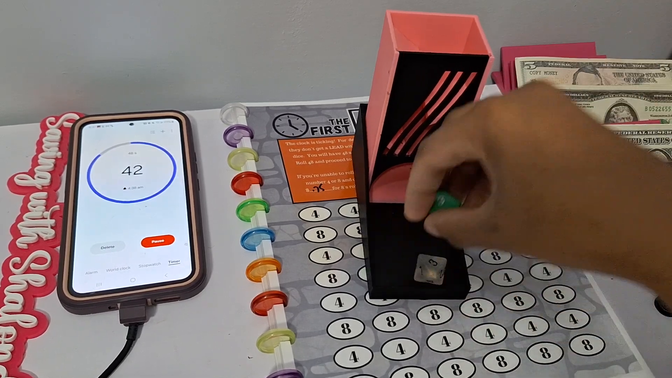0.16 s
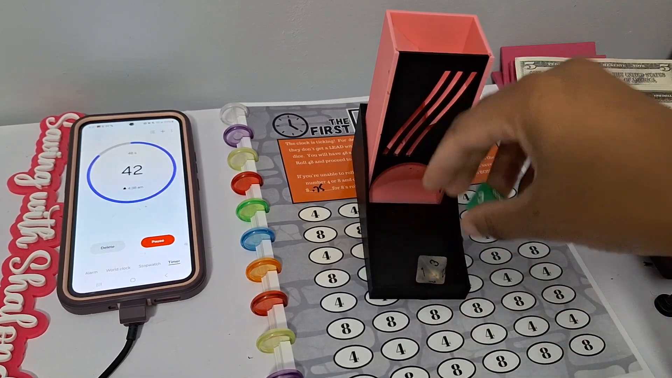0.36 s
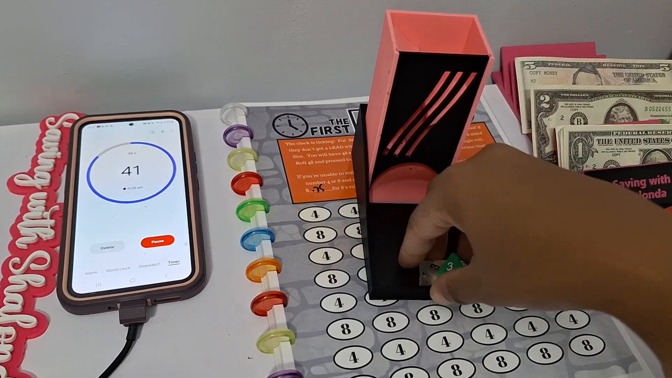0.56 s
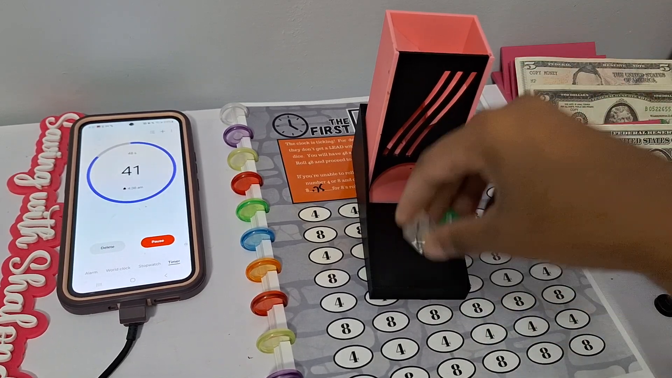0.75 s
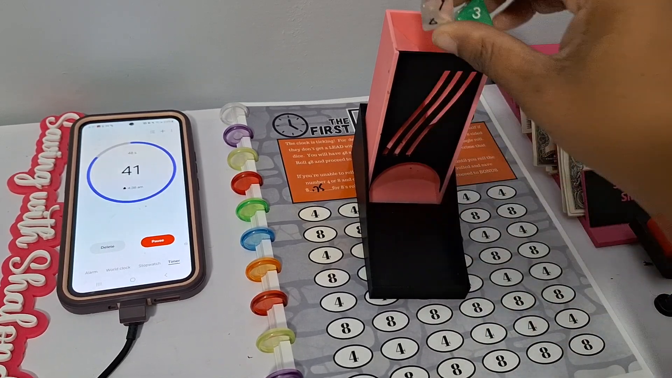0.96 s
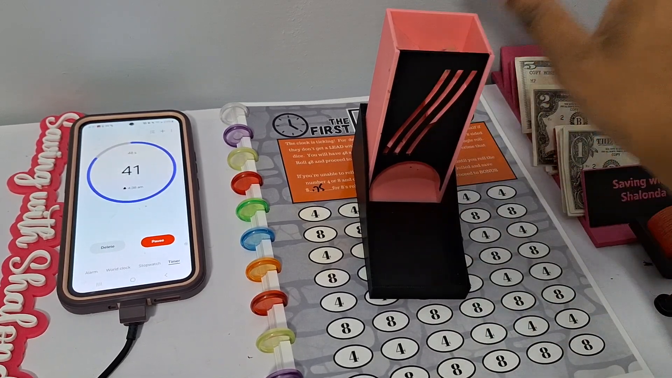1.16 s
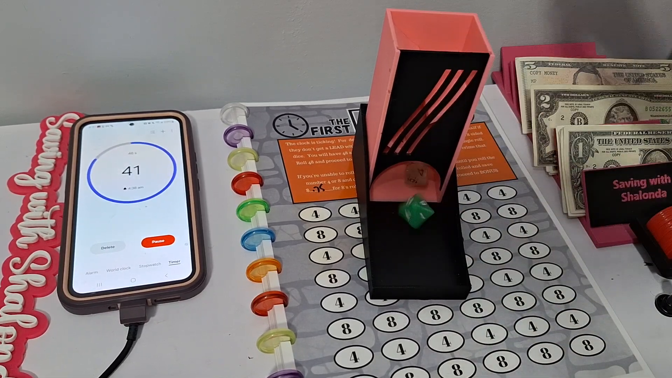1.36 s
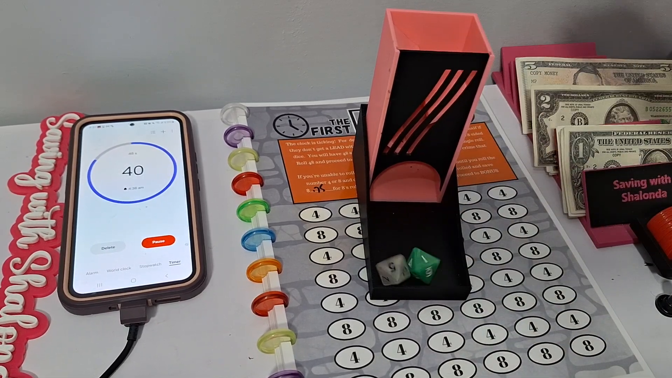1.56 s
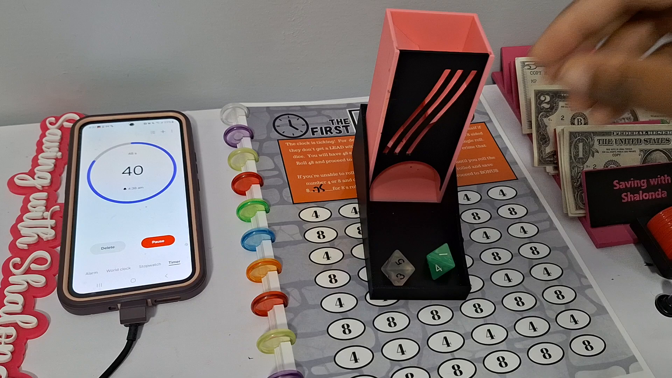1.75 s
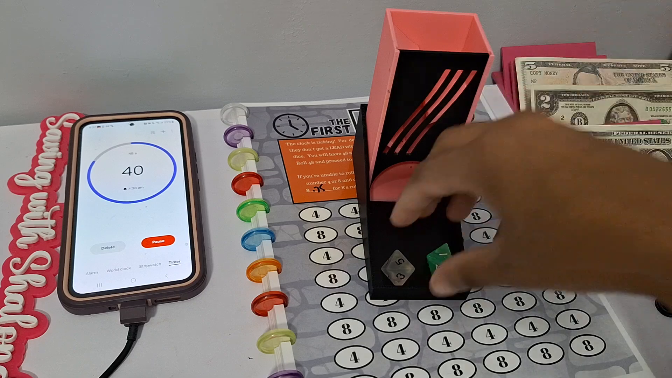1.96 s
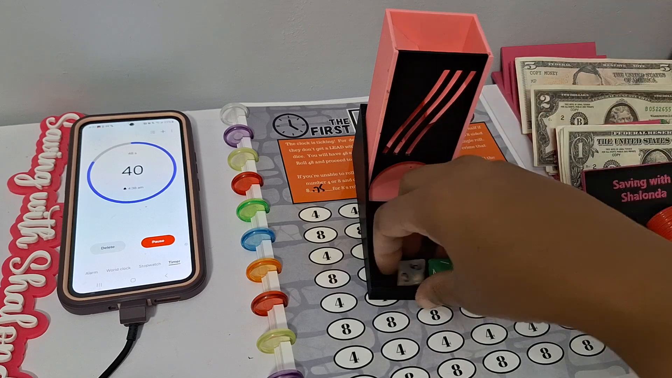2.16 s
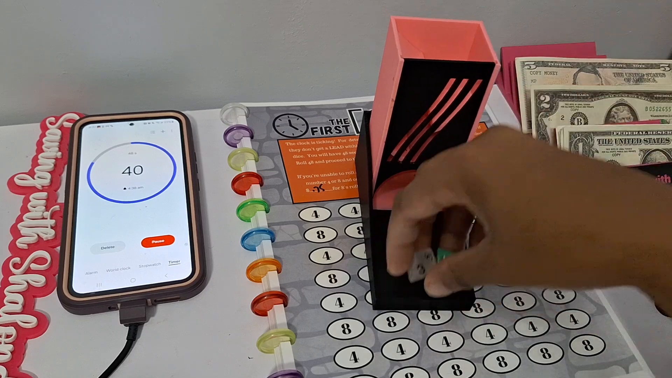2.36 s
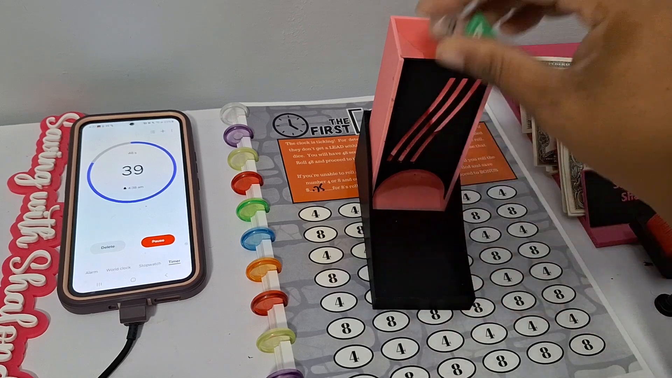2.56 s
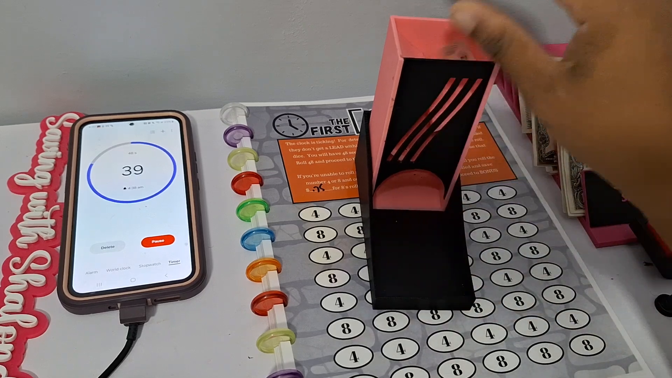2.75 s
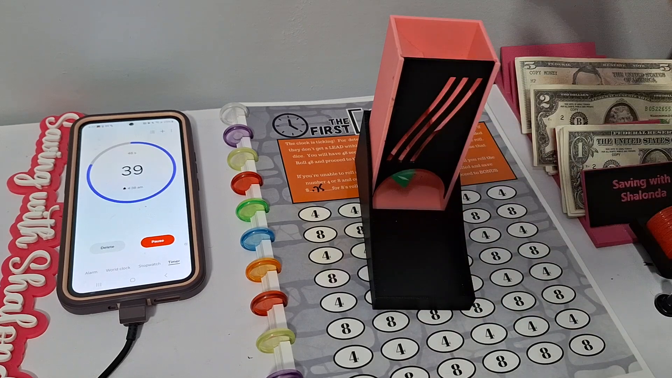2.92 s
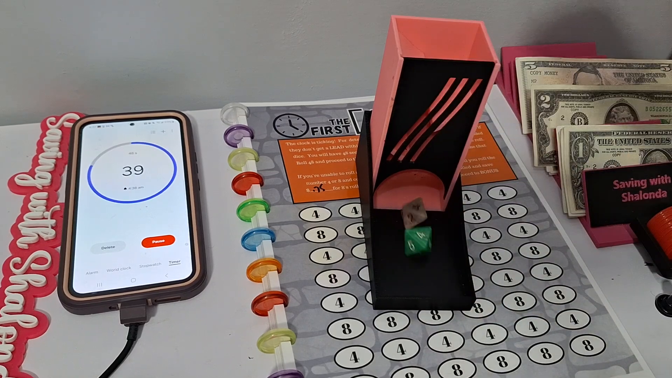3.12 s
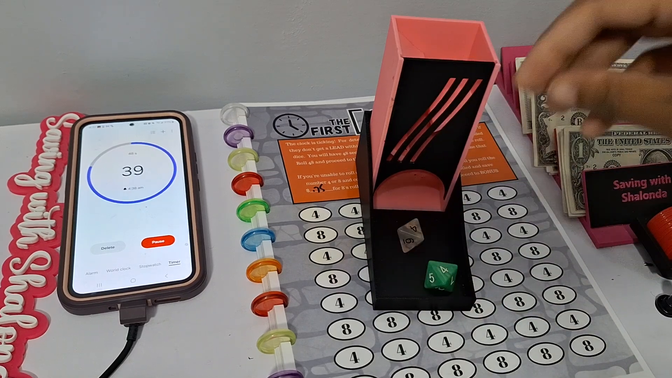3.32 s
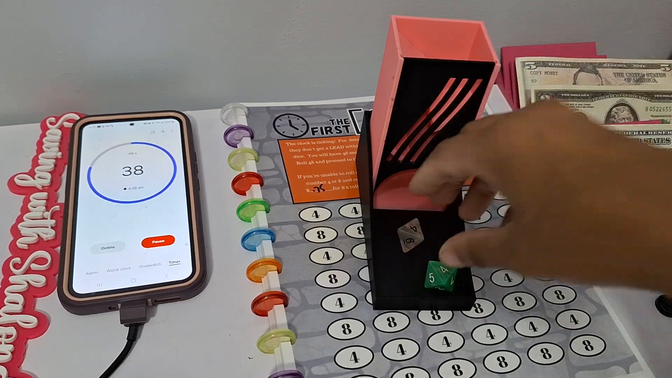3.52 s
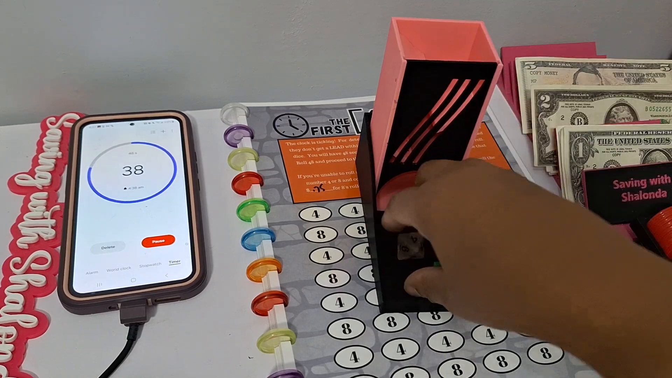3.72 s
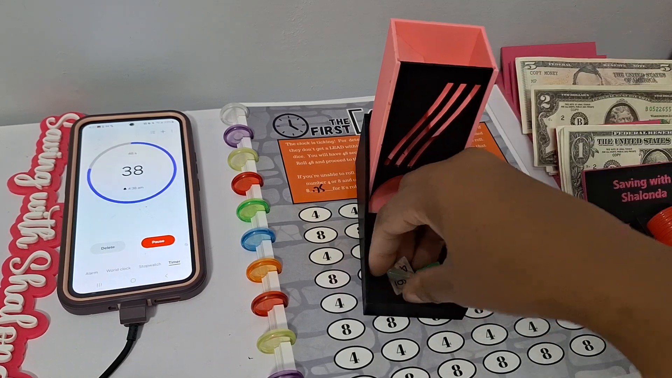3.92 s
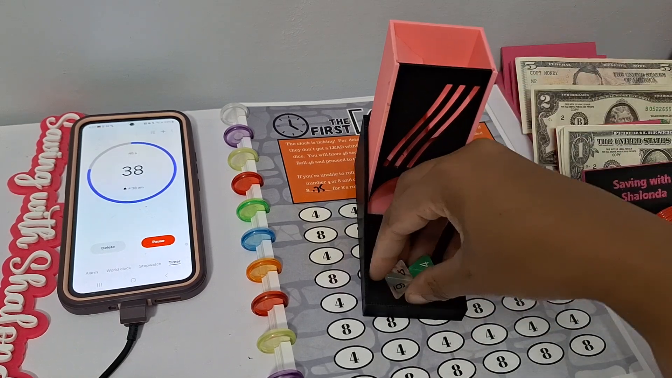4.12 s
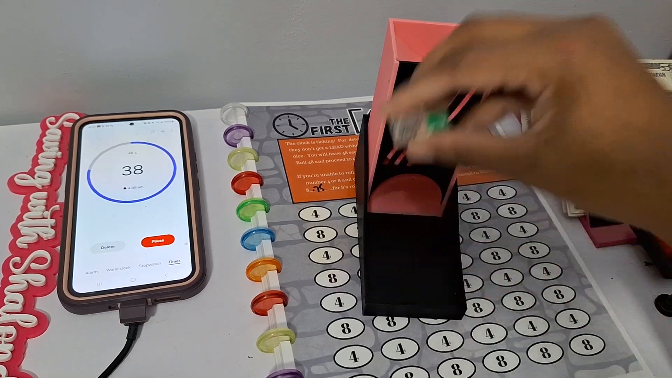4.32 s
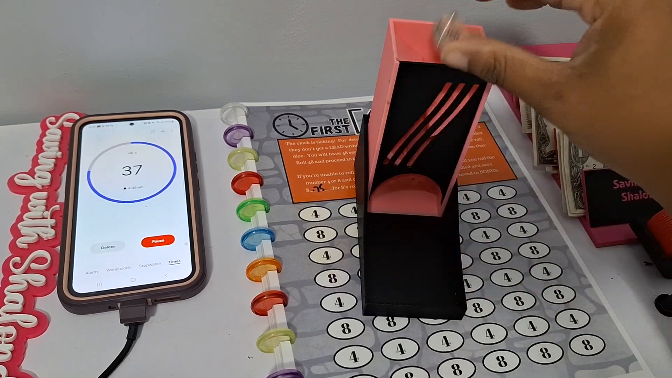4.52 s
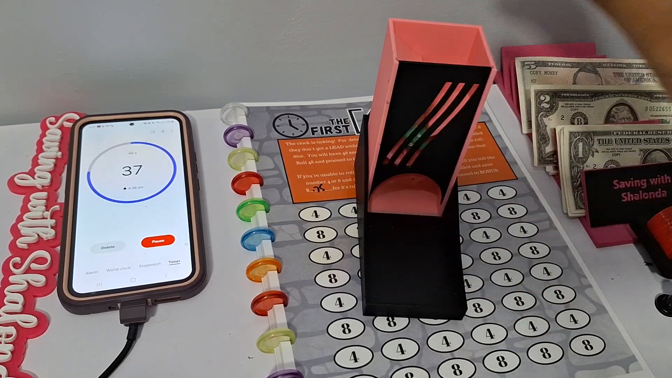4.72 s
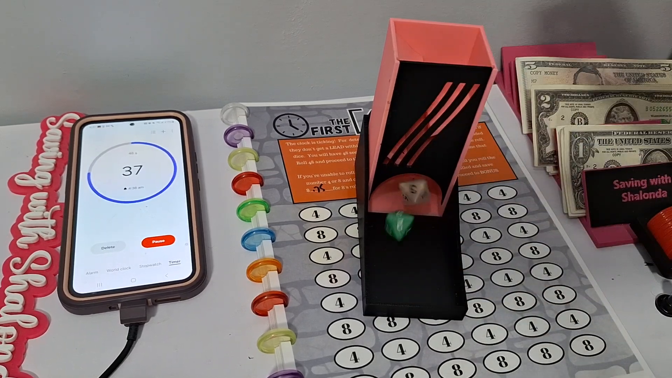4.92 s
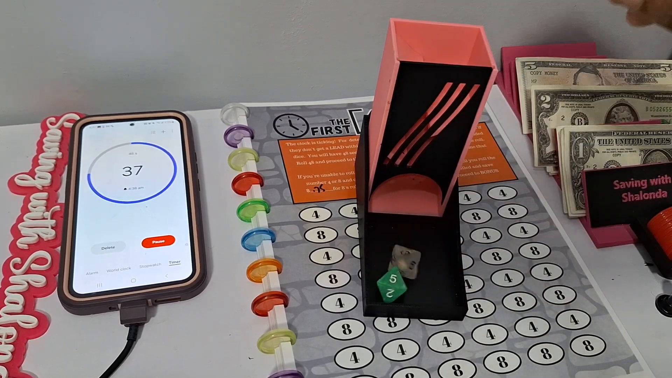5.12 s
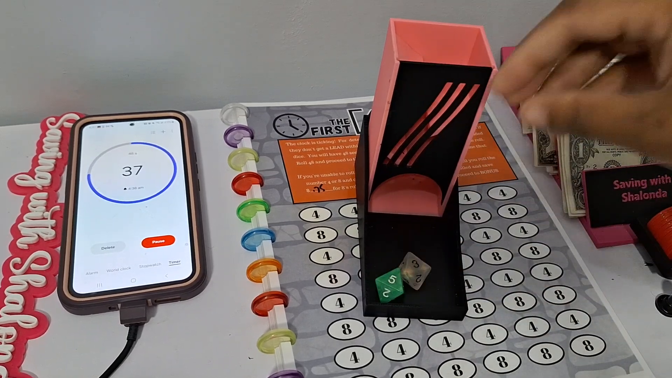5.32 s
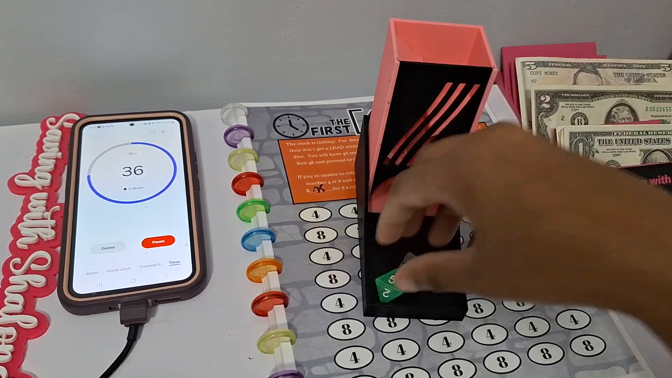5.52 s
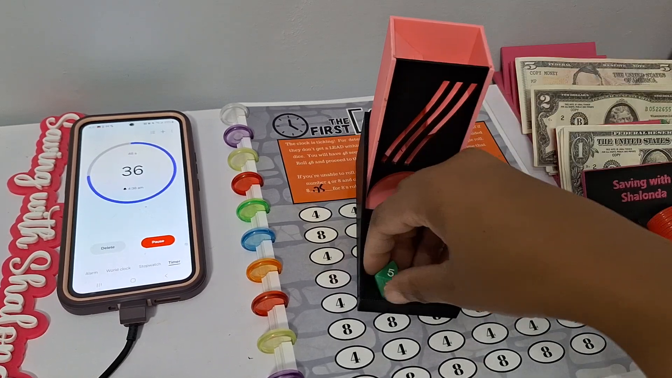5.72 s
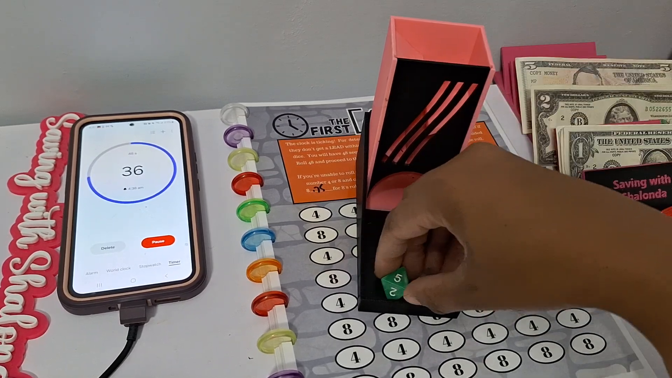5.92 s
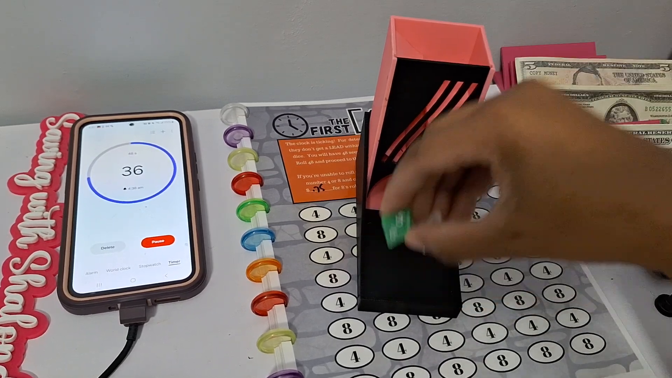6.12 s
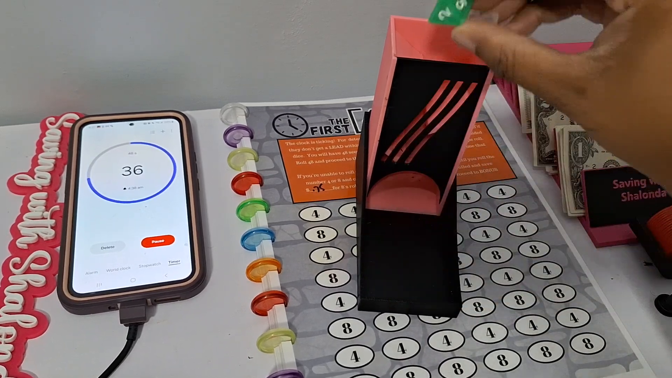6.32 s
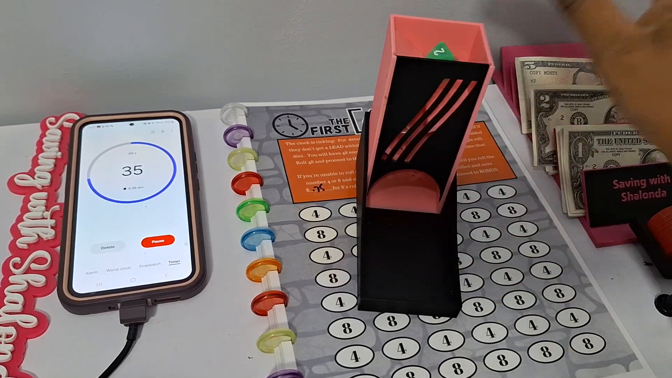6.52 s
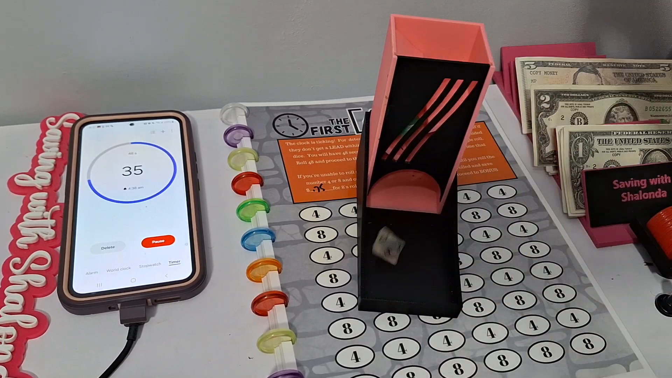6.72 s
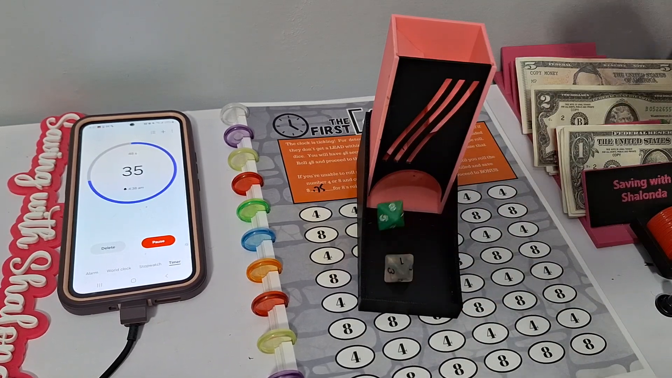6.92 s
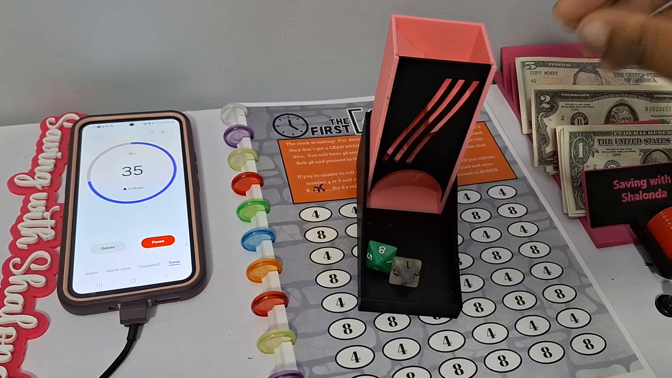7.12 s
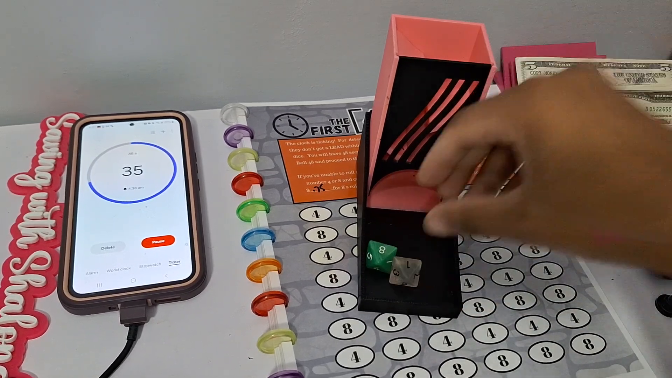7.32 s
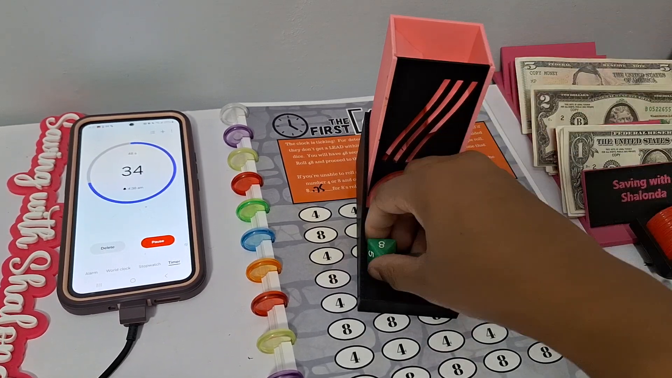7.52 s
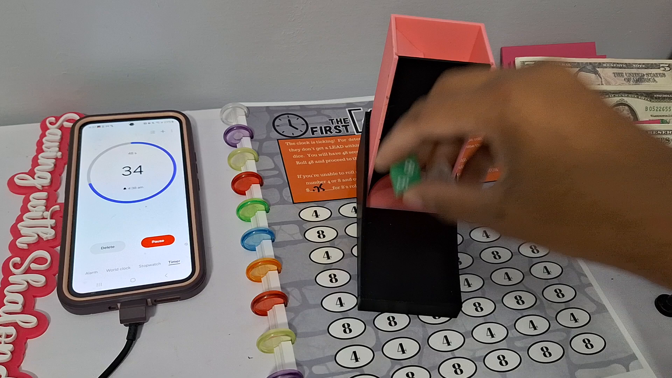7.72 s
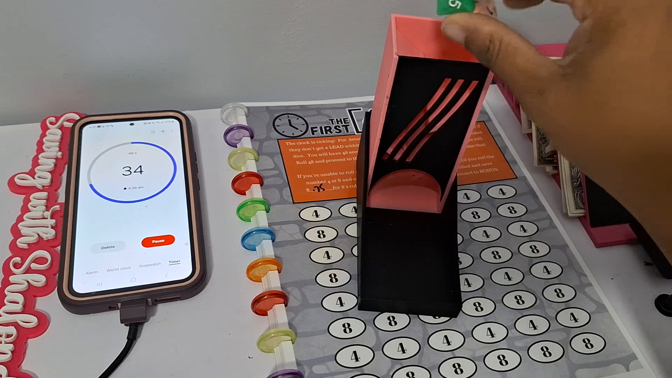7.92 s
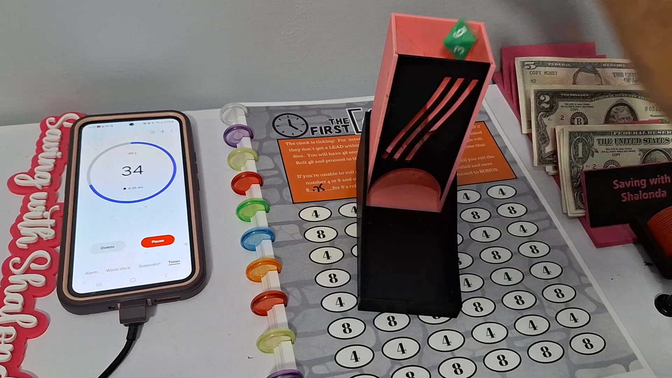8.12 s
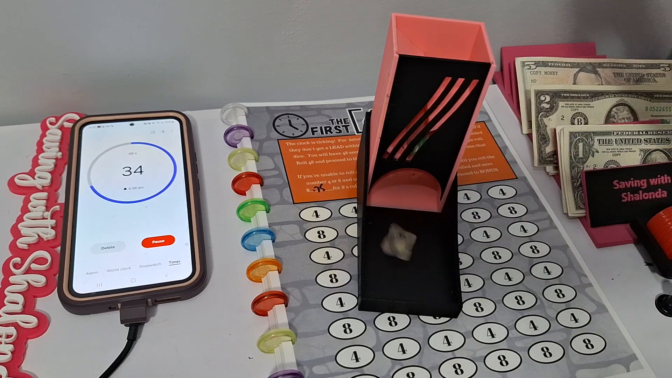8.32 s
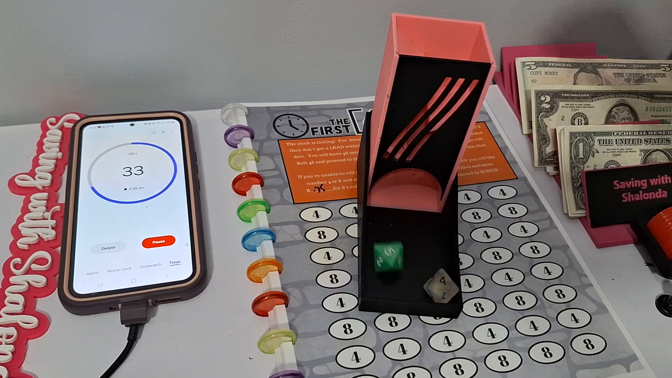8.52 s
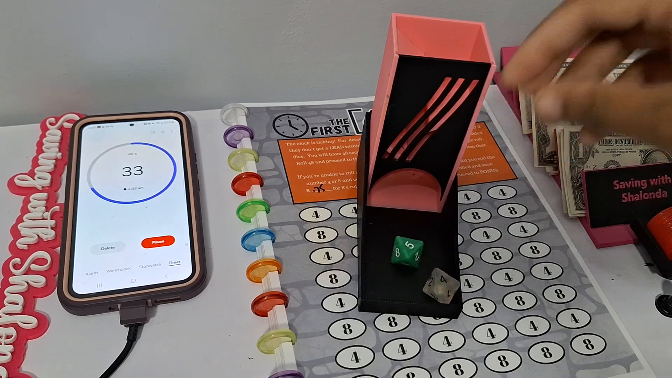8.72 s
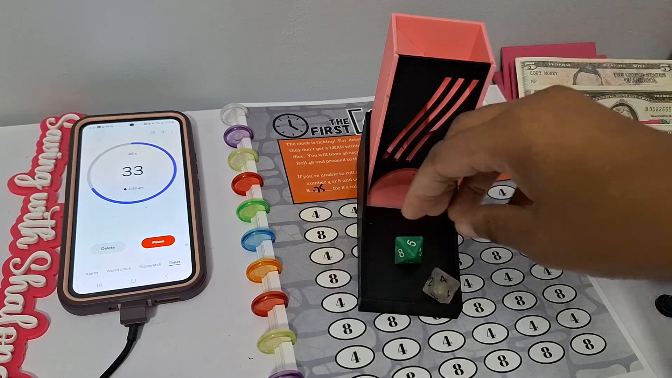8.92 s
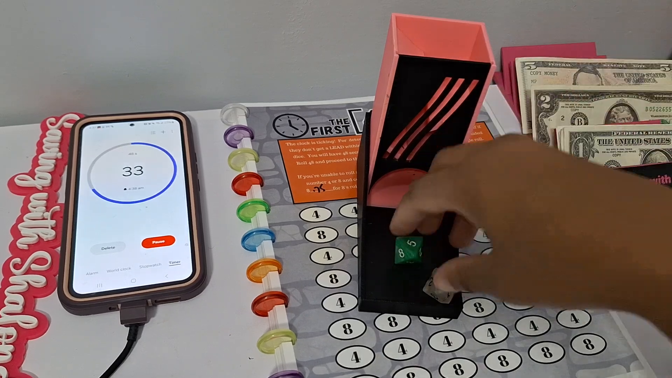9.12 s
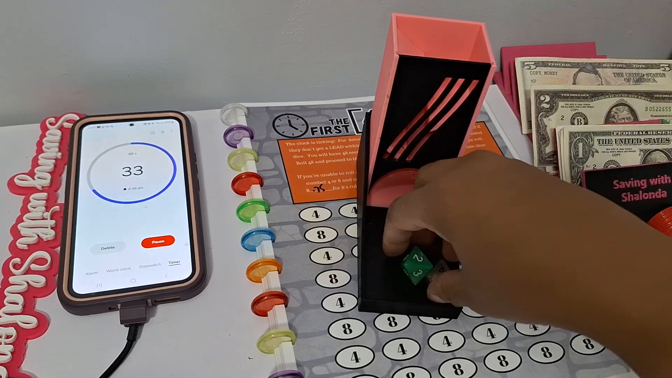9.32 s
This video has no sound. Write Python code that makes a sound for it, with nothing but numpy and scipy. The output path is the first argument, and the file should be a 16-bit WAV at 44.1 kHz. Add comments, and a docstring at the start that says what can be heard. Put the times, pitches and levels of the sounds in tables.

```python
"""Two dice clatter five times down a thin plastic tower, over its baffles, and tumble into the tray below.
Between throws fingers gather them with lighter clicks and scuffs. Hum, rumble and hiss lie beneath.
Timed knocks ring damped modes of tower or tray and spit bright noise; dense tiny clicks make the patter.
The table under the tray thumps softly through its own low modes, and a small room answers the dice."""
import sys
import numpy as np
from scipy import signal
from scipy.fft import rfft, irfft
from scipy.io import wavfile

SR = 44100
rng = np.random.default_rng(int(sys.argv[2]) if len(sys.argv) > 2 else 0)


def materialize(psi):
    """Save the field psi as 16-bit PCM at rate SR to the path in sys.argv[1].

    A 1-D psi becomes a single channel; in a 2-D psi each row is a channel.
    """
    bounded = np.clip(np.atleast_2d(psi).T, -1, 1)
    quanta = np.round(bounded * 32767).astype(np.int16)
    wavfile.write(sys.argv[1], SR, quanta)


N = 417186  # length in samples

# relative spectrum of hard plastic contact: (f/Hz, level/dB)
CRACK_SPECTRUM = [(240, -46), (400, -30), (609, -16), (2290, -7), (2710, -3.5), (3370, -3), (5500, -7),
                  (7700, -11.5), (8600, -19.5), (12900, -22), (15300, -23.5), (16500, -34)]
# the five throws: (dropped/s, out of the tower/s, at rest/s)
THROW_TIMES = [(1.1, 1.44, 1.8), (2.75, 3.05, 3.35), (4.61, 4.93, 5.35), (6.48, 6.85, 7.2),
               (8.07, 8.41, 8.8)]
SPLIT_HZ = 1900  # parts the low modes of the plastic from the high ones


def from_db(db):
    """Decibels to gain."""
    return 10 ** (np.asarray(db) / 20)


def rms_one(x):
    """Scaled to unit power."""
    return x / np.sqrt(np.mean(x ** 2) + 1e-30)


def in_time(rows, silent_db=-140):
    """Curve columns at every sample, silent outside the table."""
    s, *columns = np.transpose(rows)
    t = np.arange(N) / SR
    return [np.interp(t, s, c, left=silent_db, right=silent_db) for c in columns]


def at_hz(points, hz, axis=1):
    """A table column read on a log-frequency scale."""
    points = np.array(points)
    return np.interp(np.log(np.maximum(hz, 1)), np.log(points[:, 0]), points[:, axis])


def coloured(x, spectrum):
    """Causal colouring: the minimum-phase filter of a spectrum, found by folding its cepstrum."""
    bins_hz = np.arange(2049) * SR / 4096
    cepstrum = irfft(np.log(from_db(at_hz(spectrum, bins_hz))))
    cepstrum[1:2048] *= 2
    cepstrum[2049:] = 0
    impulse = rms_one(irfft(np.exp(rfft(cepstrum)))) / 64  # unit energy over 4096 samples
    return signal.oaconvolve(x, impulse[None], axes=1)[:, :N]


def stereo_noise(alike):
    """White noise whose two sides correlate by the amount alike."""
    alike = np.clip(alike, 0, 1)
    mid, side = rng.standard_normal((2, N))
    return np.sqrt((1 + alike) / 2) * mid + np.sqrt((1 - alike) / 2) * side * [[1], [-1]]


def drift(rate):
    """Smooth random wander of unit power: noise through two equal low-pass poles at rate/Hz."""
    r = np.exp(-2 * np.pi * rate / SR)
    wander = signal.lfilter([1], [1, -2 * r, r * r], rng.standard_normal(N + SR))
    return rms_one(wander[SR:])  # the first second only settles the filter


def ring(clicks, hz, t60):
    """A damped resonator: a unit click sets a sine of height 1 ringing."""
    r, w = from_db(-60 / (t60 * SR)), 2 * np.pi * hz / SR
    return signal.lfilter([0, np.sin(w)], [1, -2 * r * np.cos(w), r * r], clicks + 1e-18)


def strike(modes, s, strengths, stutter_s, lag_s):
    """Each knock is a quick stutter of corner and edges, felt differently by each mode.
    Each mode reaches the two channels at its own lag, and each knock leans a little to one side."""
    lean = from_db(rng.normal(-0.39, 1.0, (len(s), 1)))
    lags = rng.normal(0, lag_s, (len(s), len(modes))) / 2
    struck = np.zeros((2, N))
    for k, (hz, _, t60) in enumerate(modes):
        touches = s[:, None] + stutter_s * rng.random((len(s), 3)) * [.3, 1, 1.8]
        sizes = rng.choice([-1, 1], touches.shape) * [.9, .45, .3] * strengths[:, k:k + 1]
        clicks = np.zeros((2, N))
        for side, sign in enumerate((1, -1)):
            at = ((touches + sign * lags[:, k:k + 1]) * SR).astype(int).clip(0, N - 1)
            np.add.at(clicks[side], at, sizes * lean ** sign)
        struck += ring(clicks, hz, t60)
    return struck


def background():
    """A hum of tone and narrow-band noise with wandering level, a low rumble and a faint hiss."""
    # relative rumble spectrum: (f/Hz, level/dB)
    rumble_spectrum = [(75, -8.5), (90, -10), (130, 1.5), (161, -12.5), (200, -12), (317, -13),
                       (420, -36.5), (600, -62)]
    # relative hiss spectrum: (f/Hz, level/dB)
    hiss_spectrum = [(300, -2.5), (500, -1.5), (1000, -3.5), (2000, -8), (3200, -3.5), (3600, 0.5),
                     (4000, -5), (6500, -14), (12000, -14), (16000, -12)]
    hum_hz, width_hz = 59, 10
    hum_gain = from_db(-61 + 1.5 * drift(4))
    edges_hz = [hum_hz - width_hz / 2, hum_hz + width_hz / 2]
    band = signal.butter(2, edges_hz, "band", fs=SR, output="sos")
    tone = np.sin(2 * np.pi * hum_hz * np.arange(N) / SR)
    hum = tone + .55 * rms_one(signal.sosfilt(band, stereo_noise(.8)))
    hum = hum_gain * hum * [[10 ** 0], [10 ** 0]] * from_db([[.8], [-.8]])  # leans to the first side
    rumble = rms_one(coloured(stereo_noise(0.75), [(40, -38)] + rumble_spectrum))
    hiss = rms_one(coloured(stereo_noise(0.22), [(100, -38)] + hiss_spectrum))
    return hum + from_db(-74.5) * rumble + from_db(-85.5) * hiss


def room(x, delay_s, length_s=.5):
    """A diffuse noise tail, partly shared by the channels, dying band by band."""
    # reverberation by band: (f/Hz, t60/s, relative level/dB)
    decay = [(500, 0.11, 2.5), (900, 0.19, 1.5), (1500, 0.25, 1.5), (3520, .32, -3.5), (7200, 0.24, -6),
             (9000, .2, -0.5), (14000, 0.059, 1.5)]
    t = np.arange(int(length_s * SR)) / SR
    tail, edges = 0, 340 * 2 ** np.arange(0, 6.1, .5)  # half-octave bands
    for low, high in zip(edges, edges[1:]):
        hz = np.sqrt(low * high)
        sos = signal.butter(2, [low, min(high, .48 * SR)], "band", fs=SR, output="sos")
        band = signal.sosfilt(sos, rng.standard_normal((2, len(t))))
        level_db = at_hz(decay, hz, axis=2) - 60 * t / at_hz(decay, hz)
        tail = tail + band * from_db(level_db)
    tail = tail + 0.44 * tail[::-1]   # both channels hear much the same room
    tail *= 1 - np.exp(-(t / delay_s) ** 2)   # the first walls are some way off
    return signal.oaconvolve(x, tail / np.sqrt(np.sum(tail ** 2) / 2), axes=1)[:, :N]


def thumps(s, level_db, thump_hz, focus_db, octaves):
    """The table under the tray booms softly, most near one pitch per blow."""
    # modes of the table top: (f/Hz, relative level/dB, t60/s)
    table_modes = [(80, -8.5, 0.14), (129, -1.5, 0.092), (211, -12, 0.27), (238, -4.5, 0.1),
                   (310, -1, 0.075), (377, -1.5, 0.051), (463, -3.5, 0.018)]
    hz, mode_db, t60 = np.transpose(table_modes)
    near = np.exp(-(np.log2(hz / thump_hz[:, None]) / octaves) ** 2)
    strengths = from_db(level_db)[:, None] * from_db(mode_db + focus_db * near)
    booms = strike(table_modes, s, strengths, stutter_s=0.007, lag_s=0.00005)
    soft = signal.butter(2, 500, fs=SR, output="sos")   # a soft push: no sharp edge
    return signal.sosfilt(soft, booms)


def hand_bumps():
    """The hand bumps tray and table, each bump favouring its own low pitch."""
    # bumps: (t/s, relative level/dB, favoured f/Hz)
    bumps = [(0.053, -57, 133), (.645, -56, 80), (2.128, -50.5, 81), (2.326, -56.5, 130),
             (3.801, -62.5, 205), (3.915, -63.5, 130), (4.363, -54, 130), (5.702, -56, 130),
             (7.55, -58.5, 130), (7.589, -59, 130.5), (9.21, -62, 204), (9.278, -48.5, 290),
             (9.32, -49, 220)]
    return thumps(*np.transpose(bumps), focus_db=19, octaves=0.22)


def knock_thumps(knocks, falling, landed):
    """The table thumps under every knock, less than in proportion; pitch follows where the die is."""
    level_db = -43 + 0.42 * knocks[:, 1] + 2.5 * rng.standard_normal(len(knocks))
    tower_hz, tray_hz, hand_hz = 124, 210, 105.3
    thump_hz = np.select([falling, landed], [tower_hz, tray_hz], hand_hz)
    return thumps(knocks[:, 0], level_db, thump_hz, focus_db=7.5, octaves=0.41)


def scuffs():
    """Level curves of fingers and dice scuffing the tray: a swell, then a quarter-second fade at one rate."""
    # scuffs: (start/s, loudest t/s, loudest level/dB, swell/dB; a negative swell starts louder)
    scuff_table = [(0, 0.156, -45.5, 16), (0.587, 0.589, -36, 6), (0.963, 1.068, -78, 4),
                   (2.084, 2.206, -40.5, 24), (2.302, 2.334, -75, 7), (3.709, 3.765, -60, 17),
                   (3.794, 3.898, -53.5, 18), (3.99, 4.005, -80, 5), (4.313, 4.321, -61.5, 1),
                   (4.356, 4.369, -64, 3), (5.659, 5.696, -48, 9), (5.845, 5.852, -56, 5),
                   (5.935, 5.937, -57, 2), (6.41, 6.414, -80.5, 0), (7.528, 7.573, -57.5, 14),
                   (8.07, 8.072, -45, -2), (9.215, 9.289, -42.5, 23), (9.297, 9.335, -50, -3),
                   (9.433, 9.446, -61, 8)]
    fade_s, fade_db_per_s = .25, 205
    return [[(start, db - swell_db), (loudest, db), (loudest + fade_s, db - fade_db_per_s * fade_s)]
            for start, loudest, db, swell_db in scuff_table]


def tumbles():
    """Level curves of faces and edges pattering: every throw passes through the same four levels."""
    # level/dB just after the drop, on leaving the tower, once rolling in the tray, at the last
    tumble_db = [-30, -36, -43, -47.5]
    late_s, rolling_after_s, still_before_s = 0.051, 0.053, 0.089
    curves = []
    for dropped, out, at_rest in THROW_TIMES:
        times = [dropped + late_s, out, out + rolling_after_s, at_rest - still_before_s]
        curves.append(list(zip(times, tumble_db)))
    return curves


def patter(curves, modes, per_s):
    """Dense tiny clicks at random moments set the plastic buzzing, with a little bright contact noise."""
    level = sum(from_db(in_time(rows)[0]) for rows in curves)
    sizes = from_db(4.5 * np.minimum(rng.exponential(1, N), 4))
    grains = (rng.random(N) < per_s / SR) * sizes * stereo_noise(.5)
    rings = sum(from_db(level_db) * ring(grains, hz, t60 / 2) for hz, level_db, t60 in modes)
    return level * (rms_one(rings) + from_db(-12.5) * rms_one(coloured(grains, CRACK_SPECTRUM)))


def cracks(knocks, t60):
    """A hard contact spits a few milliseconds of bright noise."""
    s, peak_db, crack_db = knocks.T[[0, 1, 5]]
    clicks = np.zeros((2, N))
    clicks[:, (s * SR).astype(int)] = from_db(peak_db + crack_db + 6) * from_db([[-1.0], [1.0]])
    envelope = signal.lfilter([1], [1, -from_db(-60 / (t60 * SR))], clicks + 1e-18)
    envelope = signal.lfilter([.05], [1, -.95], envelope)   # the contact takes half a millisecond to build
    return coloured(envelope * stereo_noise(0.21), CRACK_SPECTRUM)


def twinned(modes, high_s, low_s):
    """Plastic damps high modes fast; facing walls add a quicker twin 5% higher.
    high_s and low_s cap the ring above and below the split."""
    damped = []
    for hz, level_db, t60 in modes:
        cap_s = low_s if hz < SPLIT_HZ else high_s
        damped.append((hz, level_db, min(t60, cap_s, .055 * (3000 / hz) ** 2.3)))
    return damped + [(1.05 * hz, level_db - 2, t60 / 2) for hz, level_db, t60 in damped]


def shell(modes, knocks, focus_db, gain_db):
    """The spot that is hit favours one high and one low pitch; each knock shares out the two mode groups."""
    s, peak_db, high_hz, low_hz, low_db = knocks.T[:5]
    hz, level_db, _ = np.transpose(modes)
    is_low = hz < SPLIT_HZ
    pitch_hz = np.where(is_low, low_hz[:, None], high_hz[:, None])
    near = np.exp(-(np.log2(hz / pitch_hz) / .09) ** 2)
    near[:, is_low] *= .6   # low modes spread over the whole body
    share = from_db(level_db + focus_db * near + 5 * rng.standard_normal(near.shape))
    low = from_db(np.minimum(low_db, 0))[:, None]
    high = np.sqrt(np.maximum(1 - low ** 2, .05))
    for group, gain in ((is_low, low), (~is_low, high)):
        share[:, group] *= gain / np.linalg.norm(share[:, group], axis=1, keepdims=True)
    strengths = from_db(peak_db + gain_db)[:, None] * share
    return strike(modes, s, strengths, stutter_s=.0035, lag_s=.00004)


def scene():
    """Falling dice ring the tower, landed dice the tray; fingers in the tray damp it."""
    # knocks of a die: (t/s, relative level/dB, high ring f/Hz, low ring f/Hz,
    # low ring share/dB (0 at most is used), relative crack level/dB)
    knock_table = [(0.053, -33.5, 2470, 1170, 0, -8), (0.067, -32.5, 2380, 1270, -8, -13),
                   (0.092, -21, 2410, 1250, -3.5, -14), (0.131, -15, 2360, 1350, -15, -13),
                   (0.144, -20, 2400, 1270, -16, -8), (0.171, -22.5, 2390, 1380, -7, -16),
                   (0.183, -28, 2370, 1160, -13, -6), (0.592, -31, 2500, 1280, 2, -0.5),
                   (0.605, -17.5, 2390, 1150, -2, -19), (0.646, -32, 2850, 1150, 5, -10.5),
                   (0.664, -35, 2520, 1150, -2, -8), (0.979, -55.5, 4950, 780, -10, -3.5),
                   (1.049, -49.5, 5920, 620, -27, -6), (1.118, -4, 4760, 1480, -13.5, -10.5),
                   (1.14, -2, 4190, 1000, -15.5, -8), (1.153, -5, 3547, 1020, -15, -8.5),
                   (1.166, -9, 3080, 1000, -18, -8.5), (1.19, -9.5, 2730, 1030, -9.5, -2.5),
                   (1.206, -4.5, 2700, 1100, -16, -9.5), (1.211, -5, 2573, 1810, -11, -13),
                   (1.241, -6, 5160, 1810, -8, -13), (1.251, -9, 5046, 1450, -6, -14),
                   (1.261, -9.5, 3620, 1590, -1.5, -9.5), (1.275, -14.5, 4650, 1590, -1, -15.5),
                   (1.293, -5.5, 3130, 1020, -11.5, -4), (1.307, -5, 2796, 1810, -12, -7.5),
                   (1.324, -5, 2632, 1720, -5.5, -14.5), (1.369, -6, 2217, 1720, -2.5, -8),
                   (1.375, -4.5, 2160, 1030, -10.5, -8), (1.408, -10, 3120, 1820, -18, -5.5),
                   (1.447, -8, 2416, 1460, -22, -14), (1.48, -13.5, 2430, 1490, -22, -16),
                   (1.499, -10, 2400, 1430, -11, -10.5), (1.51, -11.5, 2390, 1660, -9.5, -11),
                   (1.542, -20.5, 2430, 1340, -1, -7.5), (1.552, -20, 4160, 1400, -12, -8),
                   (1.569, -15, 4260, 1040, -15, -6), (1.591, -15, 2410, 1140, -3.5, -10.5),
                   (1.652, -24, 1990, 1140, -2, -8), (1.663, -21, 2400, 1460, -12, -11),
                   (1.688, -28, 4270, 1220, -3, -6), (2.085, -44, 2810, 1160, 1, -18),
                   (2.12, -41, 1980, 1210, -1, -17), (2.132, -30.5, 3960, 1690, -2, -16),
                   (2.16, -30.5, 1910, 1230, 0.5, -7.5), (2.187, -27.5, 1910, 1160, 0, -18),
                   (2.195, -34, 2410, 1130, 3, -10), (2.205, -30.5, 2350, 1290, 0, -4),
                   (2.222, -23, 2394, 1310, -10, -12.5), (2.233, -24, 1923, 1160, -4.5, -7.5),
                   (2.326, -34.5, 2010, 1160, 0, -16), (2.767, -7.5, 4142, 1480, -16, -7),
                   (2.779, -1, 4220, 1490, -9, -7.5), (2.799, -8, 3647, 1560, -14, -6.5),
                   (2.819, -1.5, 2656, 1560, -19.5, -10.5), (2.861, -6, 2670, 1810, 1, -8),
                   (2.896, -4, 3106, 1120, -10, -5), (2.904, -6, 3600, 1810, -8.5, -7),
                   (2.936, -12, 3120, 1700, -23.5, -1), (2.958, -6.5, 2270, 1000, -10.5, -11.5),
                   (2.994, -5.5, 3030, 1710, -13, -10), (3.021, -7.5, 3070, 1710, -20.5, -3.5),
                   (3.065, -14.5, 2700, 1720, -11, -9.5), (3.093, -9.5, 2610, 1260, -8.5, -13.5),
                   (3.13, -26, 2700, 1460, -8, -12), (3.143, -14, 3560, 1140, -10, -12),
                   (3.163, -20, 2690, 1550, -10, -6), (3.172, -19, 3580, 1510, 0, -5.5),
                   (3.182, -17.5, 2440, 1520, -25, -12), (3.192, -26, 2700, 1450, 2, -20),
                   (3.221, -18.5, 3500, 1140, -8, -9.5), (3.263, -24, 2450, 1140, -4, -11),
                   (3.822, -34, 2900, 1250, -1.5, -20), (3.852, -33, 2910, 1160, -14, -9.5),
                   (3.89, -26, 2800, 1140, -15, -19), (3.897, -43, 2430, 1040, -7, -12),
                   (4.002, -44, 2420, 1150, -7, -20), (4.016, -42.5, 2434, 1160, -17.5, -13),
                   (4.318, -52, 2170, 1150, -6, -9), (4.365, -41, 2900, 1460, -3.5, -11.5),
                   (4.626, -9.5, 4513, 1200, -23, -4.5), (4.634, -2.5, 3670, 1680, -15.5, -11),
                   (4.679, -12, 3760, 1670, -14, -12), (4.702, -3, 3636, 1820, -6, -11),
                   (4.706, -9, 2757, 1810, -9, -6.5), (4.731, -6, 4740, 1710, -7.5, -12),
                   (4.736, -7, 2970, 990, -7.5, -8), (4.771, -3.5, 4310, 1020, -9, -11.5),
                   (4.785, -16.5, 4225, 1030, -13.5, -7.5), (4.798, -6, 2870, 980, -7, -7.5),
                   (4.826, -5, 2680, 1810, -7, -8), (4.856, -6, 4270, 1810, -7, -9),
                   (4.884, -10, 2700, 1890, -14.5, -6.5), (4.901, -13.5, 2625, 1010, -5, -7),
                   (4.914, -10, 2110, 1130, -2, -7), (4.949, -5.5, 5190, 1700, -27.5, -9.5),
                   (4.969, -10, 2620, 1140, -8, -7.5), (4.986, -15.5, 2546, 1520, -9.5, -13),
                   (4.994, -17, 3555, 1440, -5.5, -4.5), (5.044, -19.5, 2400, 1450, -14.5, -6.5),
                   (5.067, -18, 2397, 1670, -11.5, -9), (5.082, -19, 4880, 1650, -9, -10.5),
                   (5.091, -10.5, 2400, 1200, -3.5, -7), (5.099, -12.5, 2120, 1440, -7, -12),
                   (5.126, -29, 2420, 1410, -7, -10), (5.14, -19, 2410, 1140, -15.5, -7.5),
                   (5.156, -11, 2420, 1550, -12.5, -10.5), (5.188, -19.5, 3500, 1210, -7.5, -9.5),
                   (5.2, -15, 2440, 1630, -26, -17), (5.21, -28.5, 2420, 1160, -16, -8.5),
                   (5.227, -18, 2470, 1180, -21, -6.5), (5.252, -22.5, 2330, 1530, -27, -8.5),
                   (5.265, -30, 2370, 1160, -12, -12), (5.664, -33.5, 2820, 620, -6.5, -17),
                   (5.677, -30, 2810, 1280, -14.5, -22), (5.681, -28.5, 2780, 1170, -6, -18),
                   (5.69, -27.5, 2360, 1340, -6.5, -25), (5.702, -29, 2810, 1030, -17, -16),
                   (5.718, -34, 2390, 1290, -4, -24), (5.743, -36.5, 5670, 1150, -9, -8),
                   (5.752, -29, 2510, 1180, -4.5, -17), (5.847, -32.5, 2550, 1160, -4, -10),
                   (5.896, -37.5, 2520, 1160, -3.5, -19), (5.932, -22, 2540, 1170, -15.5, -15.5),
                   (6.415, -56, 5230, 660, -22, -6.5), (6.499, -7.5, 3760, 1870, -21.5, -12),
                   (6.506, -4, 3840, 1890, -21, -7.5), (6.513, -8, 4230, 1890, -15.5, -6.5),
                   (6.526, -4.5, 4310, 1890, -16.5, -10.5), (6.589, -5, 2620, 1860, -17.5, -8),
                   (6.6, -4.5, 2697, 1870, -8.5, -14.5), (6.62, -11, 3600, 970, -9.5, -2.5),
                   (6.665, -3, 5040, 1700, -6, -11.5), (6.673, -5, 4090, 1700, -2.5, -4),
                   (6.708, -4.5, 1893, 1480, -8.5, -11.5), (6.735, -13.5, 4250, 970, -9.5, -5),
                   (6.765, -11, 2670, 990, -15, -8.5), (6.77, -5.5, 2520, 1560, -9, -7),
                   (6.79, -15.5, 2097, 1540, -0.5, -10), (6.807, -15.5, 4190, 1820, -0.5, -12),
                   (6.842, -10.5, 2480, 1560, -16, -7.5), (6.854, -3.5, 2130, 1020, -13, -9.5),
                   (6.895, -3.5, 5120, 1580, -12, -10.5), (6.928, -12, 5200, 1000, -13, -1),
                   (6.982, -7, 3140, 1450, -7.5, -8), (7.051, -18, 5150, 1570, -9, -7.5),
                   (7.056, -16.5, 2410, 1550, -6, -8), (7.088, -30, 3680, 1460, -8, -4),
                   (7.099, -19.5, 3480, 1550, -9, -7), (7.128, -20, 2340, 1530, -23, -9.5),
                   (7.146, -26.5, 2370, 1460, -10, -5.5), (7.544, -50, 2780, 1040, -14, -14),
                   (7.577, -44, 2800, 1140, -8, -14), (7.59, -32, 2460, 1070, -8, -9),
                   (8.081, -12.5, 5340, 1400, -8.5, -6.5), (8.087, -4, 4230, 1010, -15.5, -9.5),
                   (8.097, -1, 4980, 1810, -20.5, -22.5), (8.126, -15.5, 1960, 1890, -15, -10),
                   (8.135, -10.5, 4650, 1140, -5.5, -4.5), (8.158, -5, 4150, 1820, -11, -9.5),
                   (8.186, -9, 3600, 1600, -4.5, -12.5), (8.216, -10, 2680, 1600, -3, -6.5),
                   (8.246, -11.5, 2160, 1010, -3.5, -13.5), (8.26, -5.5, 4240, 1690, -3, -8.5),
                   (8.267, -9, 4120, 1700, -9, -9.5), (8.302, -5.5, 2640, 1220, -30, -6.5),
                   (8.315, -12, 2720, 1820, -17, -15), (8.331, -13.5, 2680, 1390, -6.5, -7.5),
                   (8.364, -7.5, 2580, 1820, -2.5, -8), (8.381, -11, 2140, 1550, -1, -7),
                   (8.41, -15.5, 2430, 1890, -22, -13), (8.42, -21, 2380, 1550, -16, -13),
                   (8.436, -1.5, 3040, 1710, -21, -12), (8.485, -11, 2930, 1420, -18, -7.5),
                   (8.493, -4, 2725, 1850, -34, -16.5), (8.52, -20.5, 2990, 1480, -8, -16),
                   (8.539, -13.5, 2800, 1550, 0, -12), (8.589, -12, 2340, 1550, -18, -9),
                   (8.607, -13, 4730, 1160, -14, -12.5), (8.64, -17, 2360, 1420, -19, -10.5),
                   (8.658, -18.5, 3520, 1170, 1, -4.5), (8.67, -27, 2380, 1150, -18, -7),
                   (8.689, -24, 2440, 1140, -12, -9), (8.717, -17, 2400, 1150, -24.5, -13),
                   (8.739, -25.5, 2420, 1130, -9.5, -9), (9.229, -20, 2940, 1680, -27, -6),
                   (9.268, -13, 2440, 1560, -18, -17), (9.281, -22, 2810, 1290, -14, -10),
                   (9.294, -16, 2410, 1040, -23, -21), (9.317, -22.5, 2450, 1690, -10, -9.5),
                   (9.33, -24, 2560, 1100, -12, -9), (9.344, -27.5, 2420, 1080, -12, -8)]
    # walls and baffles of the tower: (f/Hz, relative level/dB, t60/s before damping)
    tower_modes = [(622, -8, 0.054), (800, -22, 0.018), (990, -6.5, 0.1), (1184, -5, 0.12),
                   (1632.6, 0.5, 0.041), (1760, -2.5, 0.031), (2170, -22, .09), (2674, -12.5, 0.29),
                   (2870, -21, 0.15), (3090, -24.5, .06), (3920, -19.5, 0.15), (3690, -17, 0.087),
                   (4290, -5, 0.05), (4205, -4, .05), (4690, 5, 0.065), (5160, -3.5, 0.033),
                   (6300, -7.5, .01), (7150, -6.5, 0.0086)]
    # floor and rim of the tray: (f/Hz, relative level/dB, t60/s before damping)
    tray_modes = [(630, -14.5, 0.097), (895, -22.5, 0.063), (1152, 1.5, 0.097), (1440, -4, .09),
                  (1558, -3.5, .09), (2054, -10.5, 0.036), (2411, -6.5, 0.016), (2792, -4, .05),
                  (3040, -20, .06), (3610, -23, .04), (4180, -1, 0.15), (5184, -5.5, .04),
                  (5270, -13, 0.0051), (6750, -10, 0.015), (7400, -8.5, 0.0093)]
    knocks = np.array(knock_table)
    dropped, out, at_rest = np.transpose(THROW_TIMES)[:, :, None]
    falling = np.any((knocks[:, 0] > dropped) & (knocks[:, 0] < out), axis=0)
    landed = np.any((knocks[:, 0] >= out) & (knocks[:, 0] < at_rest), axis=0)
    tower = twinned(tower_modes, high_s=.06, low_s=.06)
    free_tray = twinned(tray_modes, high_s=0.026, low_s=0.041)
    held_tray = twinned(tray_modes, high_s=.012, low_s=.035)

    plastic = shell(tower, knocks[falling], focus_db=24, gain_db=-1)
    plastic += shell(free_tray, knocks[landed], focus_db=15, gain_db=-0.5)
    plastic += shell(held_tray, knocks[~falling & ~landed], focus_db=11, gain_db=-0.5)
    plastic += cracks(knocks, t60=0.023)
    plastic += patter(scuffs(), held_tray, per_s=2200)
    plastic += patter(tumbles(), tower, per_s=1100)
    walls = signal.butter(6, 560, "high", fs=SR, output="sos")   # small walls radiate no bass
    dice = signal.sosfilt(walls, plastic)

    table = knock_thumps(knocks, falling, landed) + hand_bumps()
    return dice + from_db(-6.5) * room(dice, delay_s=0.0015) + table + background()


def record(dry):
    """Peaks are squashed smoothly towards a ceiling of 0.74; then the deepest bass and the top are cut."""
    full = dry / (1 + (dry / .74) ** 4) ** .25
    full = signal.sosfilt(signal.butter(3, 48, "high", fs=SR, output="sos"), full)
    top_cut = signal.cheby2(14, 90, 16950, fs=SR, output="sos")  # 90 dB down from 16950 Hz upwards
    return signal.sosfilt(top_cut, full)


dry = scene()
out = record(dry)
materialize(out)
```